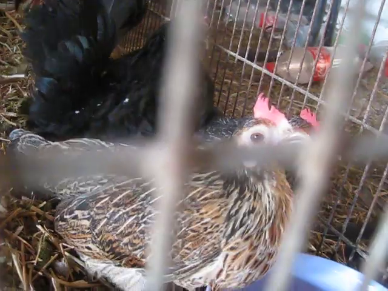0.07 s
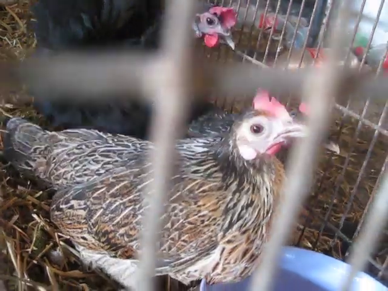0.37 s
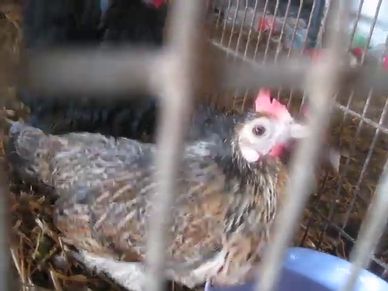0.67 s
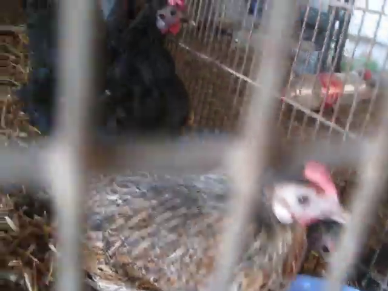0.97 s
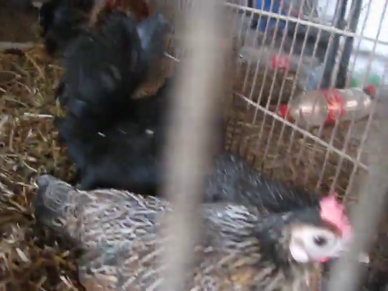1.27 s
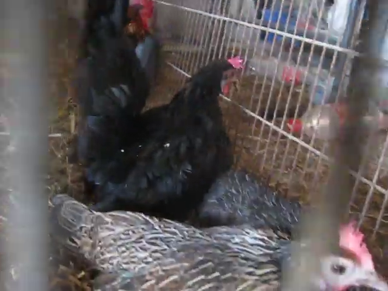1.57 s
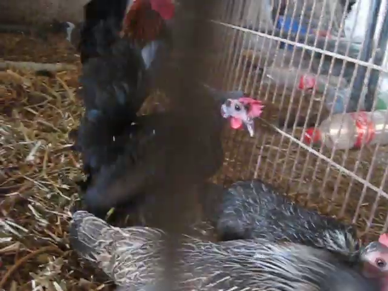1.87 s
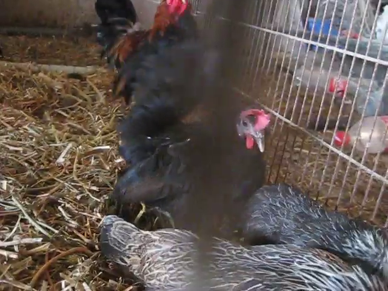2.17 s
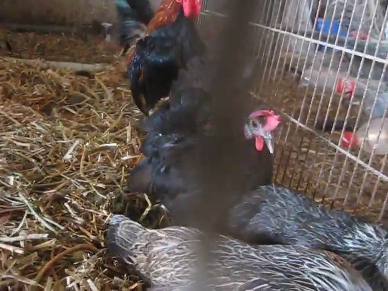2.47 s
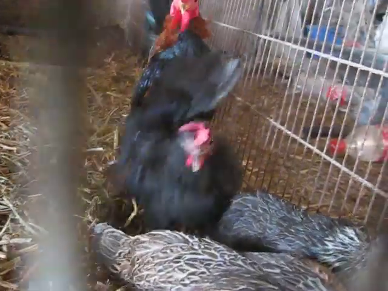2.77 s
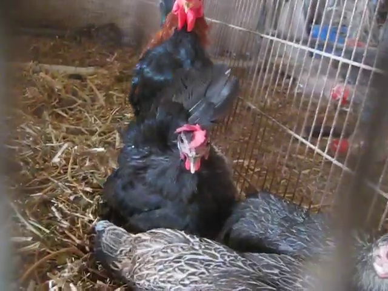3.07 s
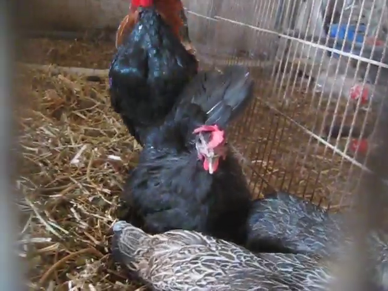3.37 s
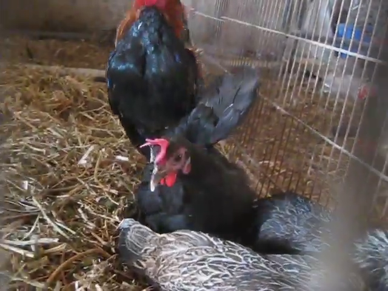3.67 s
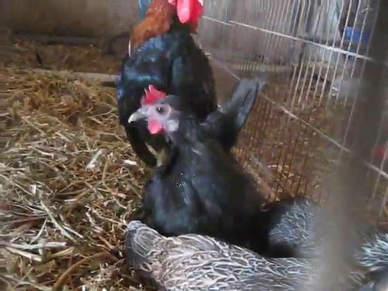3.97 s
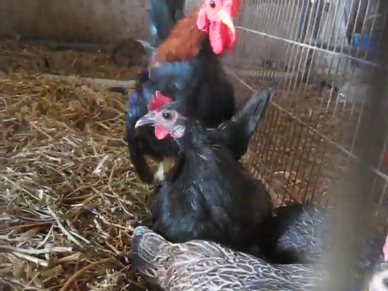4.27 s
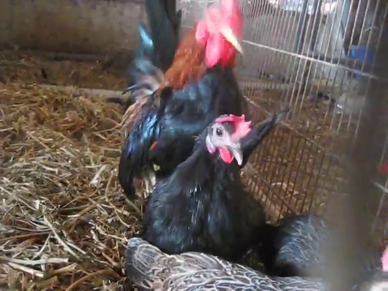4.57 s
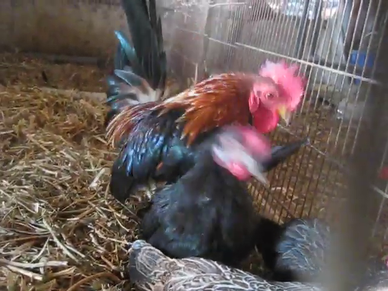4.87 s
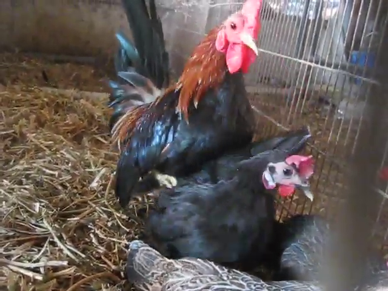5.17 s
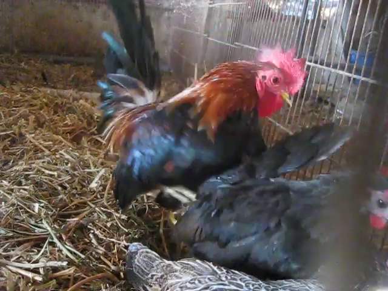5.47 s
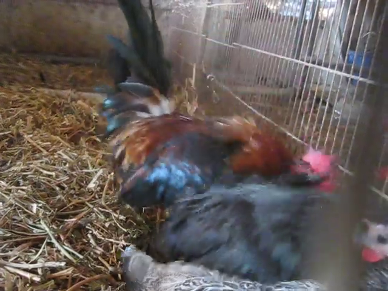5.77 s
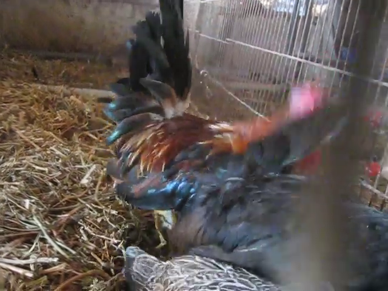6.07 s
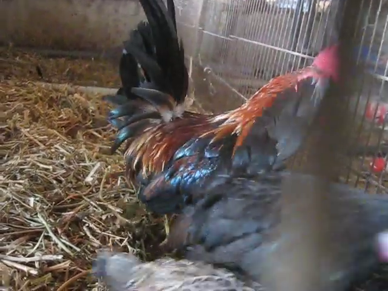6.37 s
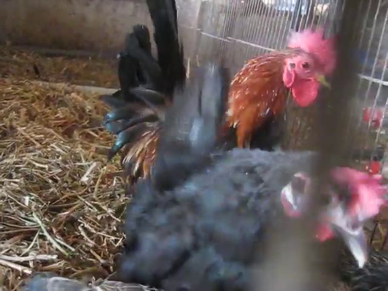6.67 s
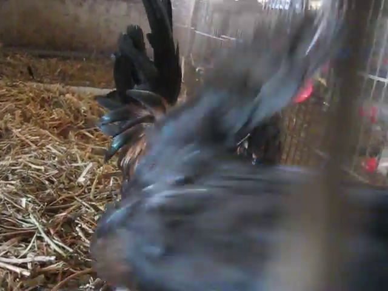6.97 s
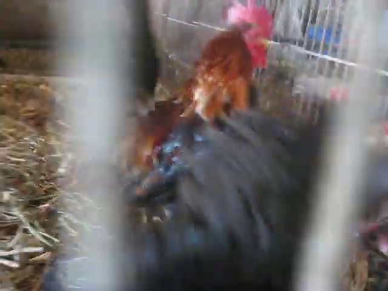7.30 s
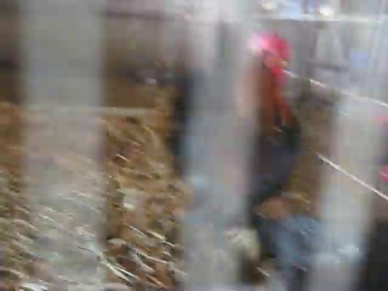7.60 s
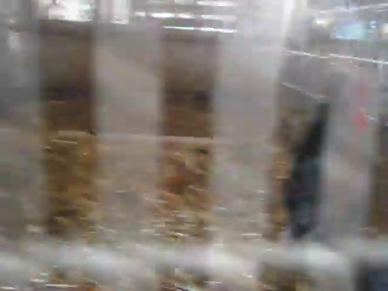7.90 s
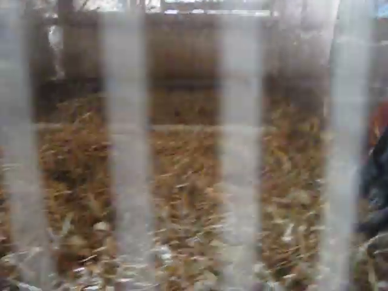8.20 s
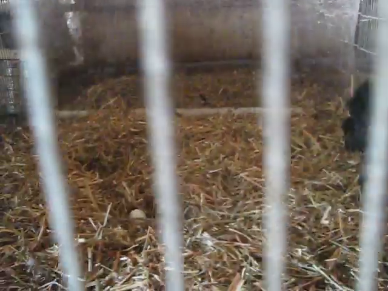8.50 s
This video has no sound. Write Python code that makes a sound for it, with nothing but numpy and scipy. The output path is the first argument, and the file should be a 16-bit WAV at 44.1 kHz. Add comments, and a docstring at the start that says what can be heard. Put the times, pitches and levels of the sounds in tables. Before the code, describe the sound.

Chickens shuffle in crackling straw, giving tiny clucks and faint rasps, with a brief wing flap and a sharp knock near the end.

```python
"""A wire cage in a yard: bantam hens and a cock shuffle about on straw, close to a hand-held camera.
Stalks crackle and snap underfoot and feathers swish over outdoor air and a low machine hum.
The birds give tiny clucks (a few beats of the syrinx), hoarse rasps (air through an open beak),
creaky chirrs (fast ringing pulses) and thin, gliding whines.
Near the end a hen flaps past and the camera is knocked and scraped at the bars."""
import sys
import numpy as np
from scipy import signal
from scipy.fft import rfft, irfft
from scipy.io import wavfile
from scipy.ndimage import uniform_filter1d

SR = 44100
rng = np.random.default_rng(int(sys.argv[2]) if len(sys.argv) > 2 else 0)


def unload_audio(sound):
    """Save the sound as a 16-bit wav file, at the path given as the first command line argument."""
    columns = np.transpose(np.atleast_2d(sound))
    # keep every value between -1 and 1, then stretch to whole-number steps
    steps = np.round(np.clip(columns, -1, 1) * 32767)
    wavfile.write(sys.argv[1], SR, steps.astype(np.int16))


N = 381024
TIME = np.arange(N) / SR
FIDGET_DB = -61  # resting load on the straw: the flock is never quite still


def undb(db):
    """Decibels to gain."""
    return 10 ** (np.asarray(db) / 20)


def unit(x):
    """Scale to rms 1."""
    return x / np.sqrt(np.mean(x ** 2) + 1e-18)


def colour(x, points):
    """EQ x along a curve of (f/Hz, level/dB) points, then scale to rms 1."""
    hz, db = np.transpose(points)
    bins = np.maximum(np.fft.rfftfreq(len(x), 1 / SR), 1)
    curve = undb(np.interp(np.log(bins), np.log(hz), db))
    return unit(irfft(rfft(x) * curve, len(x)))


def ring(x, hz, width):
    """One resonance, gain 1 at its centre."""
    hz, width = min(hz, SR / 2 - 2000), min(width, SR / 3)
    return signal.lfilter(*signal.iirpeak(hz, hz / width, fs=SR), x)


def walk(rate, size=N):
    """Smooth random modulation of spread 1 that turns about rate times a second."""
    hold = max(int(SR / rate), 1)
    steps = np.repeat(rng.standard_normal(size // hold + 2), hold)
    return np.sqrt(3 / 2) * uniform_filter1d(steps, hold)[hold:hold + size]


def span(seconds):
    """Time axis of a short sound."""
    return np.arange(int(seconds * SR)) / SR


def add(out, s, x):
    """Mix x into out at time s."""
    i = max(int(s * SR), 0)
    out[i:i + len(x)] += x[:max(N - i, 0)]


def swell(t, length, rise, fall):
    """Envelope of a gesture; rise and fall are shares of its length."""
    return np.clip(t / (rise * length), 0, 1) * np.clip((length - t) / (fall * length), 0, 1)


def strokes(rows, rise, fall):
    """One swell for each row of t/s, length/s, level/dB."""
    out = np.zeros(N)
    for s, length, db in rows:
        add(out, s, undb(db) * swell(span(length), length, rise, fall))
    return out


def crackle(rate, scatter_db):
    """Random tiny clicks of unequal size, about rate a second, at rms 1."""
    sizes = undb(scatter_db * np.minimum(rng.exponential(size=N), 4))
    return unit((rng.random(N) < rate / SR) * sizes * rng.choice([-1, 1], N))


def yard(air_db=-53, waver_db=1.0, drift_rad=0.99):
    """A bed of outdoor air and the wavering hum of a mains-driven machine nearby."""
    # spectrum of the air: f/Hz, relative level/dB
    air_eq = [(20, -4), (55, 0.5), (95, 2), (160, 2.5), (350, 1), (600, 1.5), (1000, 0), (2000, -4.5),
              (4000, -6.5), (6500, -10.5), (11000, -12.5), (16000, -19)]
    # partials of the hum: f/Hz, rms level/dB
    partials = [(79.2, -68), (100.2, -65), (121, -68.5)]
    air = undb(air_db + 0.8 * walk(rate=2.5)) * colour(rng.standard_normal(N), air_eq)
    hum = np.zeros(N)
    for hz, db in partials:
        peak = np.sqrt(2) * undb(db + waver_db * walk(rate=5.8))
        hum += peak * np.sin(2 * np.pi * hz * TIME + drift_rad * walk(rate=3.4))
    return air + hum


def coop(x, t60=0.066, wet_db=-17):
    """Add short, dull reflections from the walls; the straw soaks up the rest."""
    t = span(.3)
    tail = ring(rng.standard_normal(len(t)), hz=870, width=3200) * undb(-60 * t / t60) * (t > .004)
    return x + undb(wet_db) * signal.fftconvolve(x, tail / np.linalg.norm(tail))[:N]


def camera(case_hz=3470, scrape_width_hz=1340, release_s=0.000084, jolt_s=.00006, grit_s=0.00077):
    """A bar jolts the camera body, which squeaks briefly at its own resonance and scrapes along."""
    # knocks on the body: t/s, level/dB, contact time/s
    knocks = [(7.2866, -6, 0.0018), (7.426, -28, 0.0024), (7.492, -25, 0.0012), (7.508, -27, 0.00091),
              (7.521, -19, 0.001)]
    # the body sliding along a bar: t/s, length/s, level/dB
    scrapes = [(7.288, 0.12, -36), (7.419, 0.038, -33.5), (7.478, .055, -38)]
    out, t = np.zeros(N), span(.01)
    for s, db, contact in knocks:
        grip = np.minimum(t / contact * 2, 1) * np.exp(-np.maximum(t - contact, 0) / release_s)
        squeak = np.sqrt(2) * grip * np.sin(2 * np.pi * case_hz * t)
        grit = np.gradient(0.61 * rng.standard_normal(len(t)) * np.exp(-(t / grit_s) ** 2))
        jolt = 1.2 * np.exp(-t / jolt_s)
        add(out, s, undb(db) * (squeak + grit + jolt))
    slips = crackle(rate=1500, scatter_db=1)
    scrape = ring(ring(slips, case_hz, scrape_width_hz), case_hz, scrape_width_hz)
    return out + strokes(scrapes, rise=0.027, fall=0.97) * unit(scrape)


def shuffling(press_share=0.17, settle_s=0.057):
    """The load on the straw: each shuffle presses it, holds, and lets it settle."""
    # a bird steps or shifts its body: t/s, length/s, level/dB
    shuffles = [(0, 0.039, -43), (.07, 0.24, -53.5), (0.26, .17, -49.5), (0.616, 0.28, -54),
                (0.85, 0.24, -49), (1.05, 0.038, -43), (1.12, 0.2, -47.5), (1.28, 0.026, -44),
                (1.387, 0.027, -47.5), (1.518, 0.26, -43.5), (1.848, 0.1, -45.5), (2.029, 0.096, -44),
                (2.163, 0.086, -43.5), (2.255, 0.046, -39), (2.336, 0.071, -45.5), (2.449, 0.062, -43),
                (2.575, 0.12, -43.5), (2.755, 0.027, -40.5), (3.047, .1, -51.5), (3.198, 0.068, -45),
                (3.28, 0.066, -50), (3.657, 0.011, -48.5), (3.994, 0.16, -47), (4.19, 0.12, -45),
                (4.54, 0.33, -56), (5.114, 0.23, -49.5), (5.37, 0.23, -52), (5.63, 0.17, -47),
                (5.857, 0.13, -48), (5.982, 0.095, -45), (6.206, 0.18, -47.5), (6.584, 0.044, -46),
                (6.655, 0.31, -48), (6.898, 0.12, -45), (7.032, .1, -50), (7.139, 0.051, -34),
                (7.303, 0.24, -38), (7.633, 0.025, -40), (7.72, 0.18, -50.5), (7.872, 0.0324, -40.5),
                (7.962, 0.081, -42.5), (8.115, 0.021, -50), (8.295, .08, -45.5), (8.42, 0.13, -49.5),
                (8.526, 0.2, -45)]
    power, t = np.full(N, undb(FIDGET_DB) ** 2), span(1)
    for s, length, db in shuffles:
        press = 1 - np.exp(-t / (press_share * length))
        settle = np.exp(-np.maximum(t - length, 0) / settle_s)
        add(power, s, (undb(db) * press * settle) ** 2)
    return np.sqrt(power)


def straw(load, rub_db=-1.5, crack_db=-4, patchy_db=2.5, uneven_db=1.38):
    """Stalks rub in a fine hiss and crack in grains, each family of stalks at its own pitch."""
    # spectrum of the rustle: f/Hz, relative level/dB
    straw_eq = [(200, -20), (600, -2), (1500, -6.5), (2600, 1), (4500, 2.5), (6500, 3), (10000, 3.5),
                (14000, 4)]
    rub = colour(crackle(rate=6000, scatter_db=0.5), straw_eq)
    stalk_hz = np.geomspace(1500, 15000, num=7)
    cracks = sum(ring(crackle(rate=140, scatter_db=3.5), hz, hz / 2) for hz in stalk_hz)
    effort = load * undb(patchy_db * walk(rate=120) + uneven_db * walk(rate=20))
    return effort * (undb(rub_db) * rub + undb(crack_db) * colour(cracks, straw_eq))


def snaps(rows, crack_s, tail_db, breadth, gain_db, give_s=0.00022, tail_s=0.006):
    """A stalk breaks or a claw lands: a short band of noise, then a faint tail as the straw settles."""
    out, t = np.zeros(N), span(.05)
    for s, db, hz in rows:
        attack = 1 - np.exp(-t / give_s)
        envelope = attack * (np.exp(-t / crack_s) + undb(tail_db) * np.exp(-t / tail_s))
        noise = rng.standard_normal(len(t)) * envelope
        burst = ring(ring(noise, hz, hz * breadth), hz, hz * breadth)
        add(out, s, undb(db + gain_db) * unit(burst) * np.sqrt(np.mean(envelope ** 2)))
    return out


def small_snaps(load, per_s=12, rest_db=-45.5, scatter_db=2.5, centre_hz=4500, spread_octaves=0.84):
    """Rows of t/s, level/dB, f/Hz for stalks that break by chance, louder under a heavier load."""
    chance = rng.standard_normal((200, 2))
    times = np.cumsum(rng.exponential(size=len(chance))) / per_s
    pressed_db = 20 * np.log10(np.interp(times, TIME, load)) - FIDGET_DB
    db = rest_db + 0.29 * pressed_db + scatter_db * chance[:, 0]
    hz = centre_hz * 2 ** (spread_octaves * chance[:, 1])
    return np.column_stack([times, db, hz])[times < TIME[-1]]


def bedding():
    """All the footwork: rustle, snapping stalks and duller knocks on the floor."""
    # the loudest stalks breaking: t/s, level/dB before gain_db, centre f/Hz
    breaks = [(0.3631, -33, 5070), (0.9127, -36, 5560), (1.0685, -25.5, 10100), (1.4181, -32.5, 3200),
              (1.6594, -23, 3200), (1.7912, -31, 3220), (2.5065, -31, 4100), (3.3201, -24, 6800),
              (3.3483, -32, 3320), (3.9898, -35, 11500), (4.118, -31, 13700), (4.2752, -20.5, 12300),
              (4.7842, -34.5, 6170), (4.9643, -33.5, 12900), (5.1427, -31, 11700), (5.223, -29, 4940),
              (5.6746, -26.5, 11900), (5.6993, -25, 12500), (5.799, -30.5, 12600), (6.2264, -26.5, 10400),
              (6.344, -32, 12000), (6.5994, -29.5, 13300), (6.8254, -26, 13300), (6.9323, -26, 12700),
              (7.0264, -27.5, 4350), (8.064, -19, 6640), (8.194, -32.5, 12800), (8.55, -27, 12100),
              (8.6243, -23.5, 4000)]
    # claws on the floor under the straw: t/s, level/dB before gain_db, centre f/Hz
    taps = [(0.225, -35.5, 1280), (2.289, -32, 860), (2.374, -34, 2240), (2.612, -33.5, 1280),
            (4.368, -34, 1320), (4.697, -39, 1080), (6.701, -37.5, 1410), (7.118, -33.5, 1660)]
    load = shuffling()
    stalks = snaps(breaks, crack_s=0.00046, tail_db=-17.5, breadth=1.2, gain_db=5)
    chaff = snaps(small_snaps(load), crack_s=0.00052, tail_db=-16.5, breadth=0.4, gain_db=5.5)
    claws = snaps(taps, crack_s=0.0013, tail_db=-20, breadth=2.2, gain_db=0.5)
    return straw(load) + stalks + chaff + claws


def wings(flutter_db=2):
    """Feather barbs slide over each other in dense, bright bursts of friction."""
    # wing strokes and feathers brushing past: t/s, length/s, level/dB
    swishes = [(7.145, 0.076, -29), (7.379, 0.055, -29), (7.454, 0.017, -20.5), (7.718, 0.015, -27.5)]
    # spectrum of the friction: f/Hz, relative level/dB
    feather_eq = [(200, -40), (1000, -6.5), (2500, -8.5), (4000, 3), (5500, 5), (10000, 5), (14000, 3)]
    envelope = strokes(swishes, rise=0.22, fall=0.55) * undb(flutter_db * walk(rate=140))
    return envelope * colour(crackle(rate=14000, scatter_db=-0.5), feather_eq)


def whines(glide_share=.5, waver=0.0095, spread=0.36, octave_db=-14):
    """A thin whistle glides toward its resting pitch; hoarseness smears it into a band of noise."""
    # whines: t/s, length/s, start f/Hz, resting f/Hz, level/dB, hoarseness (1 and up is all noise)
    calls = [(1.372, 0.09, 2950, 3140, -49.5, 0.65), (3.473, 0.0047, 2470, 2380, -46, .2),
             (3.655, 0.066, 3400, 3780, -51.5, .25), (3.76, 0.132, 1380, 1520, -60, 0),
             (4.092, 0.24, 2010, 2340, -59, 0.7), (4.476, 0.24, 2960, 3454, -58, 0.3),
             (4.522, 0.14, 3850, 4080, -49, 0.37), (5.233, 0.273, 856, 909, -54.5, 0.44),
             (5.545, 0.019, 1850, 2090, -45.5, 0.3), (5.761, .095, 841, 1094, -55, 0.4),
             (6.12, .046, 3250, 1910, -41.5, 1.1), (7.942, 0.093, 1848, 2110, -67, 0.3)]
    out = np.zeros(N)
    for s, length, start_hz, rest_hz, db, hoarse in calls:
        t = span(length)
        hz = rest_hz + (start_hz - rest_hz) * np.exp(-t / (glide_share * length))
        phase = 2 * np.pi * np.cumsum(hz * (1 + waver * walk(rate=210, size=len(t)))) / SR
        whistle = np.exp(1j * phase) + undb(octave_db) * np.exp(2j * phase)
        smear = (walk(spread * rest_hz, len(t)) + 1j * walk(spread * rest_hz, len(t))) / np.sqrt(2)
        noise_share = np.clip(hoarse, 0, 1)
        voice = whistle * (np.sqrt(1 - noise_share) + np.sqrt(noise_share) * smear)
        add(out, s, undb(db) * unit(voice.real) * swell(t, length, rise=0.073, fall=0.41))
    return out


def creaks(pulse_hz=320, jitter=0.044, scatter_db=2.9, glide_s=0.025, rise_s=0.0097, fall_share=.8):
    """A fast train of dry pulses; each rings a resonance that glides as the call goes on."""
    # chirrs and their resonance: t/s, length/s, start f/Hz, target f/Hz, width/Hz, level/dB
    calls = [(0.348, 0.069, 3100, 1640, 330, -43.5), (5.087, 0.028, 5600, 4500, 2200, -40.5),
             (5.119, 0.15, 5400, 5360, 1900, -48), (5.122, .12, 2660, 1720, 300, -49),
             (5.255, 0.21, 2710, 1740, 279, -44), (5.407, 0.15, 3100, 1850, 280, -45.5),
             (5.521, 0.059, 1700, 2020, 250, -51), (5.698, 0.18, 3000, 2720, 686, -46.5)]
    out, t = np.zeros(N), span(0.011)
    tick = 0.09 * (t == 0)
    for s, length, start_hz, target_hz, width, db in calls:
        chance = rng.standard_normal(size=(96, 2))
        starts = (np.cumsum(1 + jitter * chance[:, 0]) - 1) / pulse_hz
        for at, size_db in zip(starts[starts < length], scatter_db * chance[:, 1]):
            hz = target_hz + (start_hz - target_hz) * np.exp(-at / glide_s)
            tone = np.sin(2 * np.pi * hz * t) + undb(-16) * np.sin(4 * np.pi * hz * t)
            pulse = tone * np.exp(-np.pi * width * t) + tick
            fade = min(1, (1 - at / length) / fall_share) * min(1, .5 + at / rise_s)
            add(out, s + at, undb(db + size_db) * fade * unit(pulse) / np.sqrt(pulse_hz * t[-1]))
    return signal.sosfilt(signal.butter(2, 800, "high", fs=SR, output="sos"), out)


def rasps(rattle_db=4.5):
    """Unvoiced, gritty calls through the resonances of the open beak."""
    # hoarse rasps: t/s, length/s, level/dB
    calls = [(1.661, 0.12, -42.5), (1.795, 0.12, -49), (2.546, 0.35, -50), (2.816, 0.24, -59.5),
             (3.583, 0.23, -58.5), (5.976, 0.16, -46)]
    # beak resonances: f/Hz, half-width of each filter stage/Hz, relative level/dB
    beak = [(590, 106, 5), (1350, 420, 2), (1940, 450, -1), (2780, 340, 2.5), (3430, 350, 3.5)]
    effort = strokes(calls, rise=0.069, fall=0.32)
    air = effort * undb(rattle_db * walk(rate=180)) * crackle(rate=1100, scatter_db=4.5)
    voice = sum(undb(db) * ring(ring(air, hz, 2 * half), hz, 2 * half) for hz, half, db in beak)
    return unit(voice) * np.sqrt(np.mean(effort ** 2))


def clucks(onset=0.66, jitter=0.055, breath=0.11, first_beat=1.3, low_hz=540, db_per_octave=29):
    """The syrinx pops open and beats only a few times; each beat rings the throat and mouth."""
    # clipped clucks: t/s, length/s, level/dB, pitch f/Hz, mouth resonance f/Hz
    calls = [(1.660, 0.0052, -36, 675, 1440), (1.77, 0.0046, -44, 704, 1380),
             (1.79, 0.0055, -39.5, 700, 1350), (1.933, 0.0043, -27.5, 686, 1310),
             (2.957, .008, -47, 605, 610), (2.984, .0075, -48, 560, 600), (3.679, 0.019, -47.5, 570, 600),
             (3.749, 0.0077, -50, 557, 690), (6.001, 0.0033, -42, 660, 810),
             (6.125, 0.0048, -39.5, 590, 1140), (6.151, 0.01, -41.5, 510, 1040),
             (6.2618, 0.003, -22, 630, 1130), (6.279, 0.0011, -29, 600, 1080),
             (6.4, 0.002, -33.5, 640, 950), (6.418, 0.0027, -43.5, 650, 900),
             (7.521, 0.0021, -25, 988, 1870), (8.18, 0.018, -34.5, 590, 1140),
             (8.623, 0.0063, -33, 534, 1080), (8.631, 0.0062, -34.5, 780, 1650)]
    # throat resonances: f/Hz, width/Hz, relative level/dB
    formants = [(690, 200, -3), (1800, 350, -6), (2950, 500, -5), (4100, 600, -10)]
    out, t = np.zeros(N), span(.05)
    for s, length, db, hz, mouth_hz in calls:
        cycles = np.cumsum(hz * (1 + jitter * walk(rate=360, size=len(t)))) / SR
        beats = np.diff(np.floor(cycles), prepend=-first_beat)  # one click a cycle
        envelope = np.clip(2 * (1 - t / length), 0, 1) * np.minimum(onset + 2 * t / length, 1)
        syrinx = envelope * (beats + breath * rng.standard_normal(len(t)))
        mouth = undb(4) * ring(syrinx, mouth_hz, width=280)
        throat = sum(undb(gain_db) * ring(syrinx, f, width) for f, width, gain_db in formants)
        top_hz = 3100 * 2 ** ((db + 32) / db_per_octave)  # a louder cluck is brighter
        band = signal.butter(3, [low_hz, top_hz], "band", fs=SR, output="sos")
        voice = signal.sosfilt(band, mouth + throat)
        add(out, s, undb(db) * unit(voice) * np.sqrt(length / t[-1]))
    return out


def scene():
    """Birds and straw with the coop's reflections, plus the dry camera knocks and the yard, in mono."""
    birds = wings() + clucks() + rasps() + creaks() + whines()
    return (coop(bedding() + birds) + camera() + yard())[None]


def record(dry, notch_hz=7887, notch_width_hz=2500, top_hz=15900):
    """The microphone has a deep notch in the treble, and the top is cut."""
    notched = dry - ring(dry, notch_hz, notch_width_hz)
    return signal.sosfilt(signal.ellip(10, .2, 70, top_hz, fs=SR, output="sos"), notched)


dry = scene()
out = record(dry)
unload_audio(out)
```